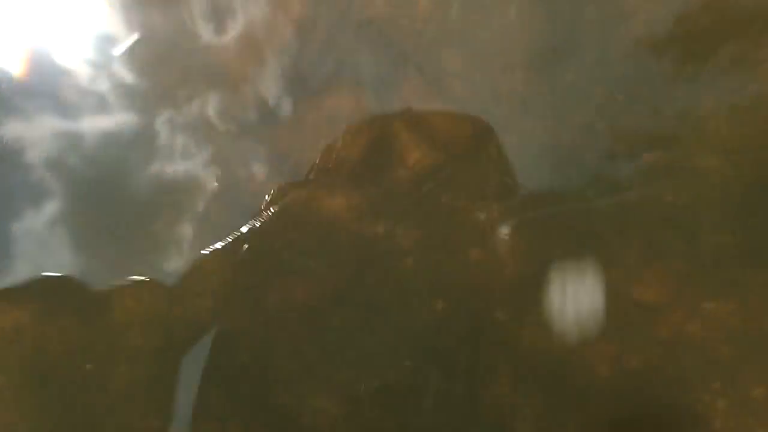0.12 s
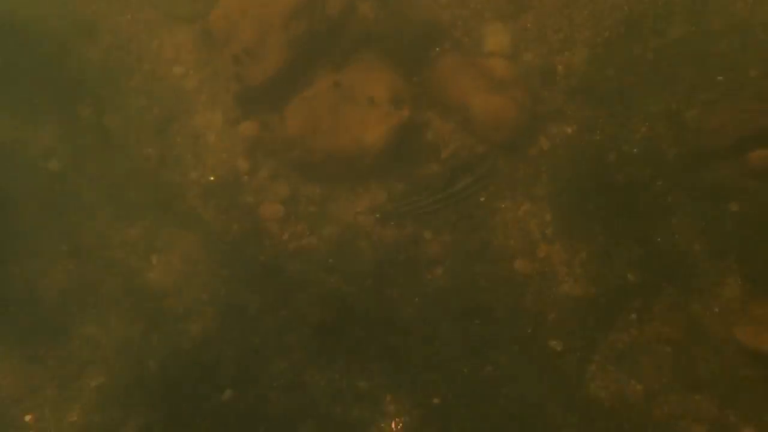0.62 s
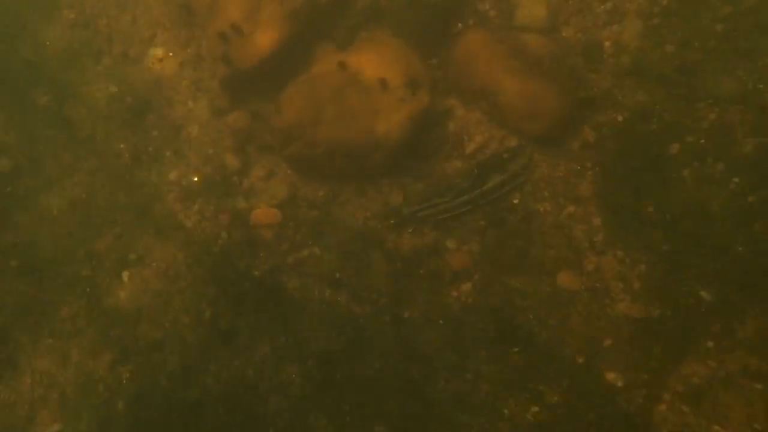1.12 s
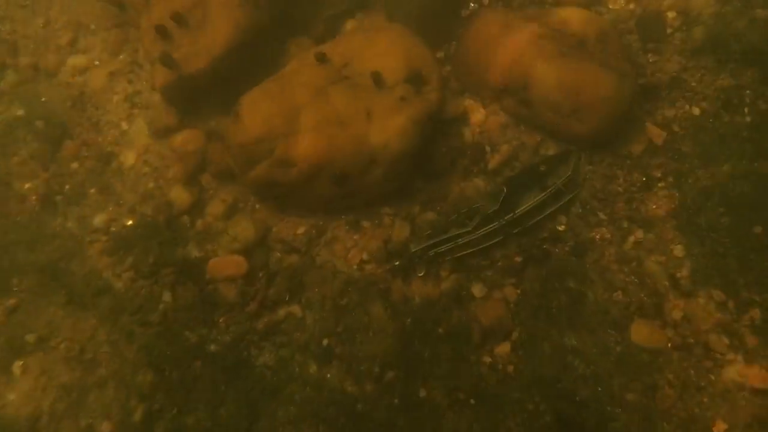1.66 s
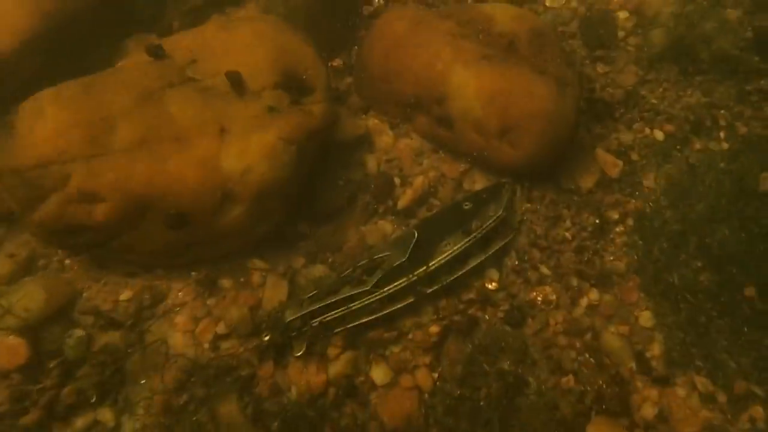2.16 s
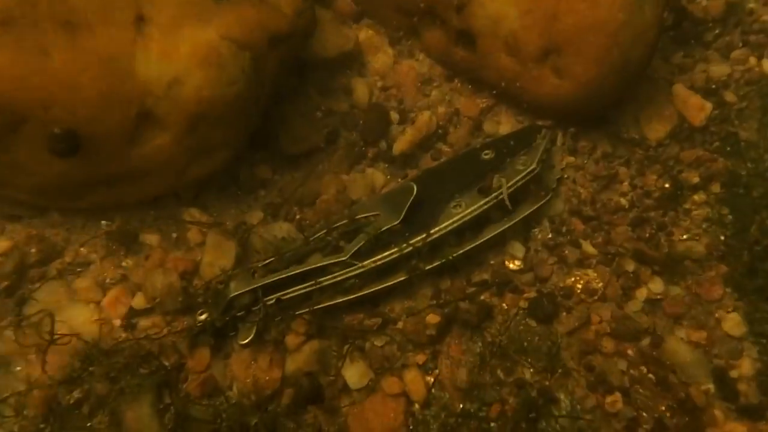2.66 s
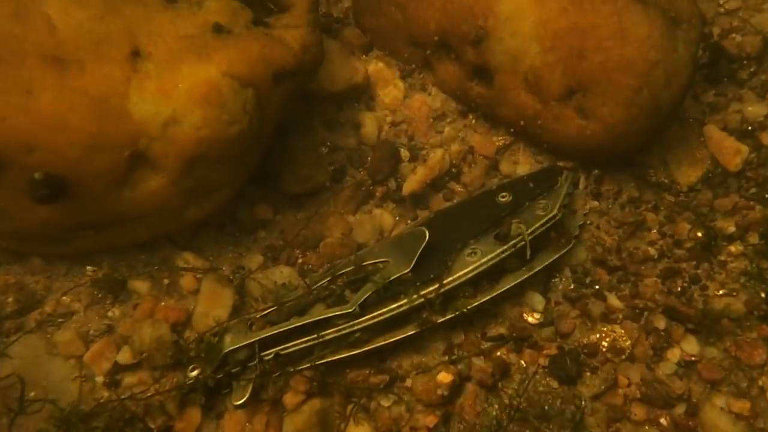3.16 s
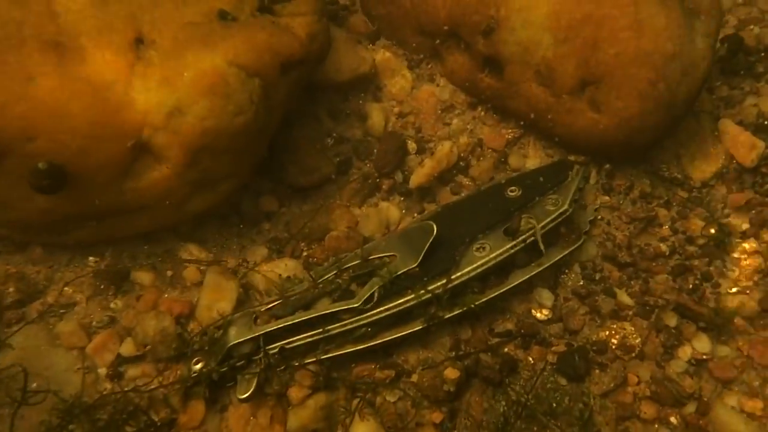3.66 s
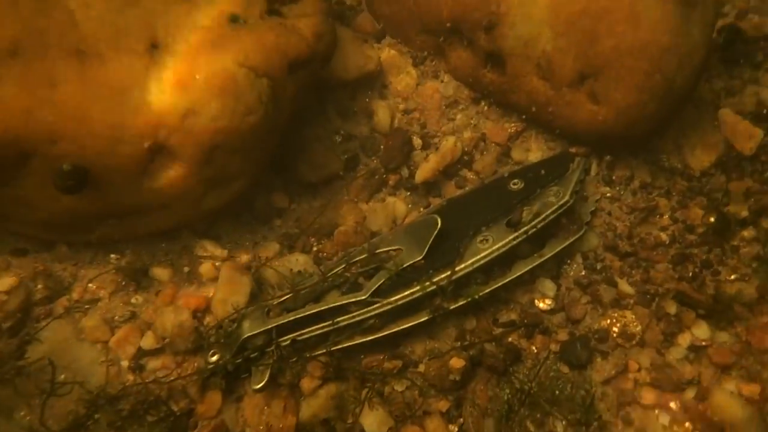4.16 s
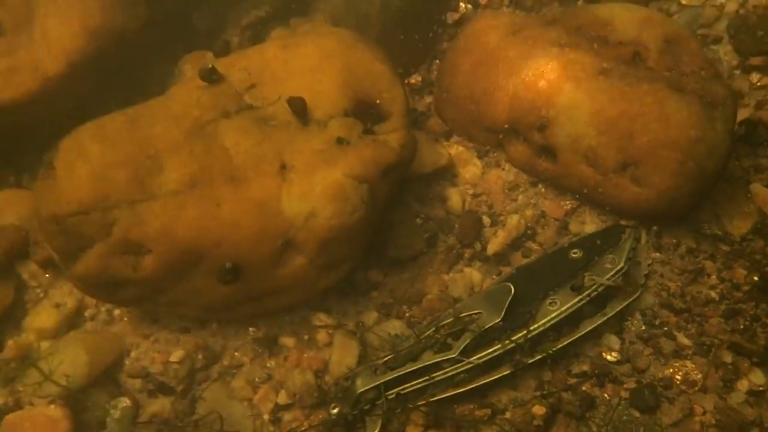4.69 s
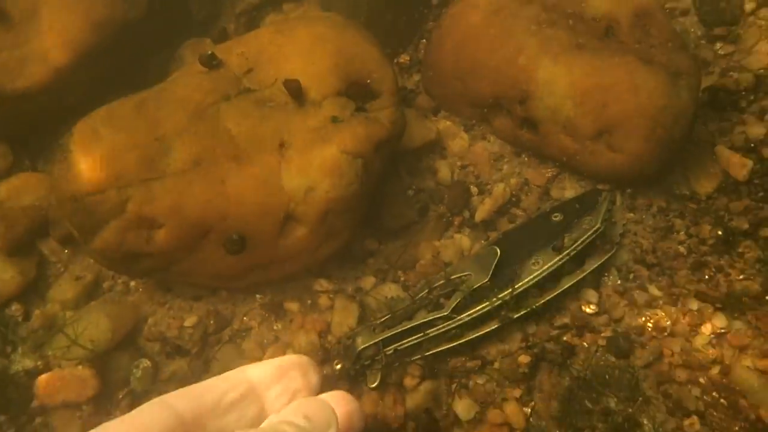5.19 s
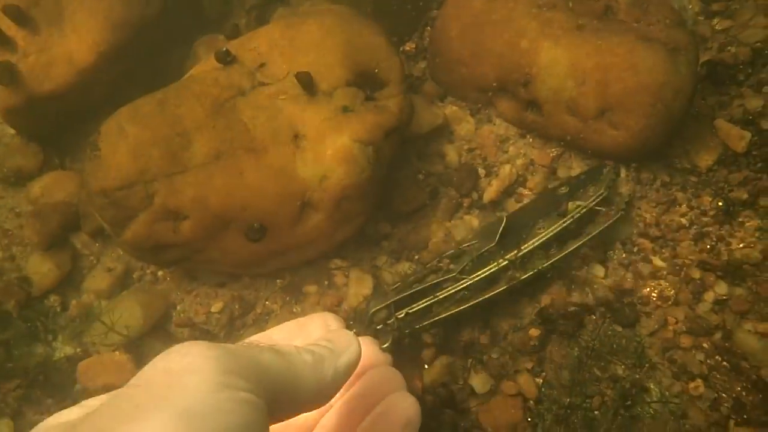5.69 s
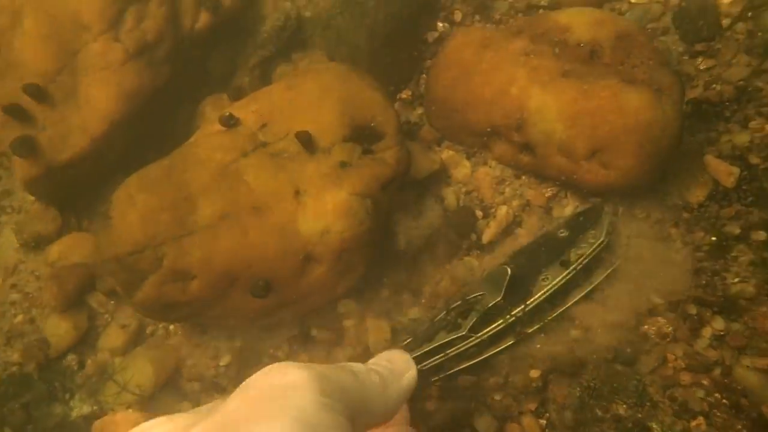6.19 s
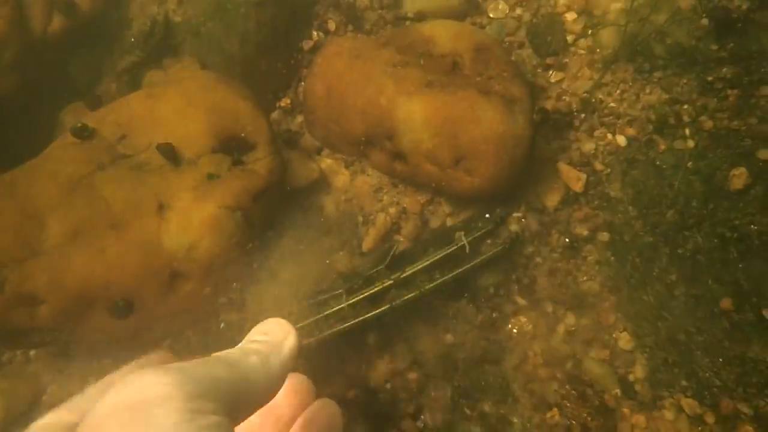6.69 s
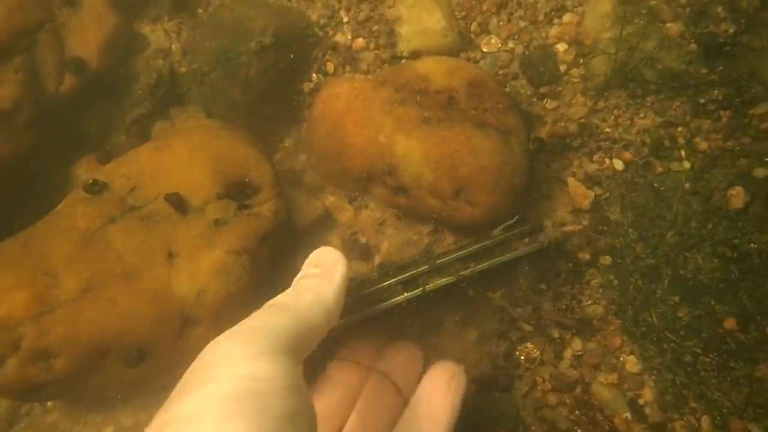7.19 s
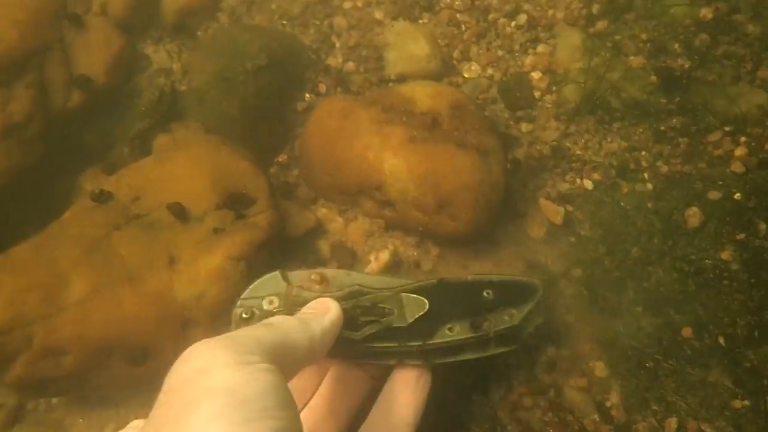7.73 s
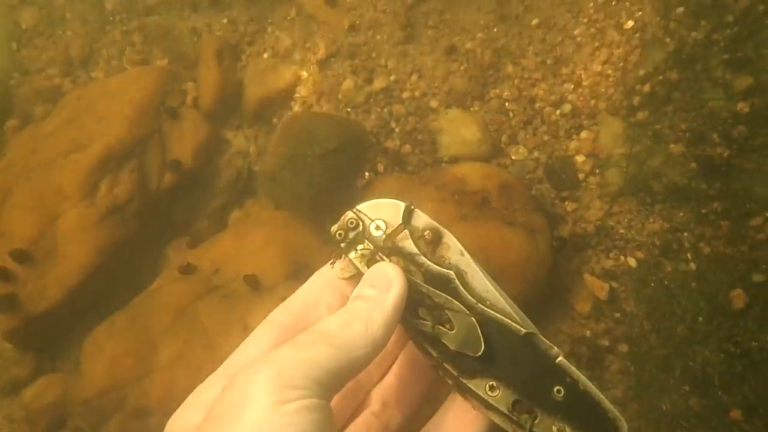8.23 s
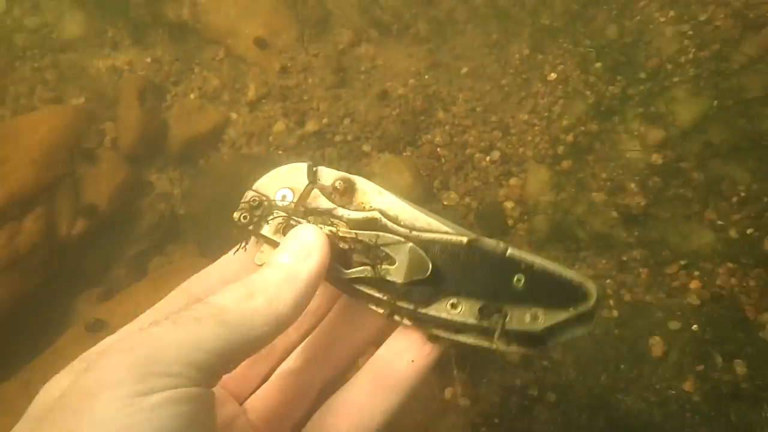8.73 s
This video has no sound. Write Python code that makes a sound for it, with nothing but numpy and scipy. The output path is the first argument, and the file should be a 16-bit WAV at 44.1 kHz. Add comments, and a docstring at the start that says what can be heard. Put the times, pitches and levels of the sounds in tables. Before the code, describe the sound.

Foam fizzes on the left, a splashy plunge, then muffled underwater current thumping and gurgling, with bubbles, hollow knocks and a soft mechanical buzz.

```python
"""Foam crackles, mostly on the left, until the port of a small camera pushed into a river floods; then all is muffled.
Current thumps on the housing and trapped air gurgles, both as clouds of short, damped wavelets; knocks, thumps and
gurgling lumps are short rings, some with a crack; bubbles and other single notes are damped tones that may slide.
Trains of soft pulses are first trapped air resonating in the port, later creaks of the grip,
and the camera's own works buzz once a picture over a faint hiss of filtered noise."""
import sys
import numpy as np
from scipy import signal
from scipy.fft import rfft, irfft
from scipy.io import wavfile
from scipy.ndimage import uniform_filter1d

SR = 44100
rng = np.random.default_rng(int(sys.argv[2]) if len(sys.argv) > 2 else 0)


def voltage_ratio(decibels):
    """Convert decibels (scalar or array-like) to amplitude ratios, 20 dB per decade."""
    exponent = np.asarray(decibels, float) / 20
    return 10 ** exponent


def waveform_to_disk(signal):
    """Save audio, clipped to [-1, 1], as 16-bit WAV at the path in sys.argv[1]."""
    frames = np.transpose(np.atleast_2d(signal))
    scaled = np.clip(frames, -1, 1) * 32767
    samples = np.round(scaled).astype(np.int16)
    wavfile.write(sys.argv[1], SR, samples)


N = 390456  # length in samples

# hiss, which the buzz of the works is set against: (time [s], level [dB])
HISS_LEVEL = [(0.37, -81), (0.55, -73), (1.05, -81.5), (1.34, -70), (2.26, -70), (3.3, -62), (3.8, -63),
              (4.2, -69.5), (4.64, -61.5), (5.7, -61.5), (6.5, -60), (7.1, -65.5), (8.85, -60.5)]
# fizz of the foam, ending when the port floods: (time [s], level [dB])
FIZZ = [(0, -48.5), (.19, -38.5), (.27, -37.5), (.3, -28.5), (.362, -33.5)]
# tone colour of foam and fine crackle at the port: (frequency [Hz], relative level [dB])
FIZZ_COLOUR = [(590, -33), (1000, 2.5), (1500, -1), (2320, -14), (3530, -5), (4010, -13), (5630, 1.5),
               (7990, -1), (9980, -22), (12900, -21), (16300, -31)]
# ringing modes of the housing: (frequency [Hz], level [dB], time to fall 60 dB [s], taken as 0.002 if less)
HOUSING_MODES = [(1770, 12.5, 0.0028), (2600, -3.5, 0.0046), (3290, 0, 0.0036), (4600, -3, 0.0031),
                 (5240, -4, 0.0031), (6790, -15, 0.011), (11900, -15, 0.0014)]


def evened(x):
    """Scales a sound to an rms of one."""
    return x / np.sqrt(np.mean(x ** 2) + 1e-20)


def curves(rows):
    """Draws straight lines through the rows of a table: one curve over time for each column."""
    s, *columns = np.transpose(rows)
    return [np.interp(np.arange(N) / SR, s, c) for c in columns]


def read(points, hz, count=1):
    """Reads a column of a table at any frequency, on a logarithmic frequency axis."""
    points = np.transpose(points)
    return np.interp(np.log(hz + 1), np.log(points[0] + 1), points[count])


def coloured(x, points):
    """Filters a sound by a table of levels over frequency, then evens it."""
    gain = voltage_ratio(read(points, np.fft.rfftfreq(N, 1 / SR)))
    return evened(irfft(rfft(x) * gain, N))


def sides(x, pan_db):
    """Spreads a sound over left and right; pan_db is left over right, and the two gains add up to two."""
    gains = voltage_ratio(np.array([pan_db / 2, -pan_db / 2]).reshape(2, -1))
    return x * gains / np.cosh(pan_db * np.log(10) / 40)


def lagged(x):
    """Sound in the housing reaches the right port five samples later."""
    return np.array([x[0], np.roll(x[1], 5)])


def decay(t60, size):
    """A fading curve that falls 60 dB in t60 seconds."""
    return voltage_ratio(-60 * np.arange(size) / SR / t60)


def rings(modes, size=3000):
    """Sum of damped tones, one for each mode of a struck body."""
    t = np.arange(size) / SR
    return sum(voltage_ratio(db) * decay(max(t60, .002), size) * np.sin(2 * np.pi * hz * t) for hz, db, t60 in modes)


def soften(x, size):
    """Rounds off sharp edges with a smooth window of the given number of samples."""
    return signal.oaconvolve(x, np.hanning(int(size)))[:len(x)]


def add(mix, s, sound):
    """Adds a two-sided sound to the mix from time s on."""
    part = mix[:, round(s * SR):][:, :sound.shape[1]]
    part += sound[:, :part.shape[1]]


def ports(a, b):
    """Two ports behind water share part of the sound, with a shift of phase."""
    # (frequency [Hz], likeness of the sides [share], phase by which the left leads [rad])
    port_likeness = [(60, 0.53, -0.05), (141, 1, -0.04), (290, 0.82, -1.28), (598, 1, 2.18),
                     (1320, 0.32, -3.5), (3200, 0.14, 2.5)]
    hz = np.fft.rfftfreq(N, 1 / SR)
    same = np.clip(read(port_likeness, hz), 0, 1)
    shared = same * rfft(a) * np.exp(-1j * read(port_likeness, hz, count=2))
    own = np.sqrt(1 - same ** 2) * rfft(b)
    return np.array([a, irfft(shared + own, N)])


def grains(low_hz, high_hz, turns, per_s, spread_db, clumps):
    """Short damped wavelets of many sizes, set off at random, more often in the clumps."""
    out = np.zeros((2, N))
    for hz in np.geomspace(low_hz, high_hz, num=10):
        u = np.arange(int(5 * turns * SR / hz)) * hz / SR / turns
        wavelet = u * np.exp(-2 * u) * np.sin(2 * np.pi * turns * u)
        when = rng.random((2, N)) < per_s * clumps / 10 / SR
        size = voltage_ratio(spread_db * np.minimum(rng.exponential(1, (2, N)), 4)) * rng.choice([-1, 1], (2, N))
        out += signal.oaconvolve(when * size, wavelet[None])[:, :N]
    return ports(*evened(out))


def hiss():
    """The noise of the microphones: coloured random noise, 5 dB stronger on the left."""
    # (frequency [Hz], relative level [dB])
    hiss_colour = [(1350, -38.5), (2300, -18.5), (2780, -10.5), (3060, -1.5), (4150, -18.5), (4690, -5.5),
                   (5620, -2), (6100, -6.5), (8050, 1.5), (9640, -7.5), (15100, -8), (16300, -6)]
    (level_db,) = curves(HISS_LEVEL)
    noise = coloured(rng.standard_normal((2, N)), hiss_colour)
    return voltage_ratio(level_db) * noise * voltage_ratio(np.array([[9], [4]]))


def works():
    """Once a picture a soft kick, a weaker one after it and a dying shudder ring the works."""
    # buzz: (time [s], level above the hiss curve [dB], left over right [dB])
    buzz_levels = [(0, -21, 11.5), (2.6, 20, 1), (2.9, 18.5, -36), (3.9, 20.5, -8), (4.3, 33.5, 8),
                   (5.3, 32, 7), (6.3, 33, 7.5), (8.85, 31.5, 8)]
    # body of the works: (frequency [Hz], level [dB], time to fall 60 dB [s])
    body_modes = [(766, 9.5, 0.034), (893, 10.5, 0.02), (1010, -10, 0.4), (488, -5, 0.049)]
    # thin upper modes: (frequency [Hz], level [dB], time to fall 60 dB [s])
    whine_modes = [(3030, 10, 0.02), (3460, -7.5, 0.073)]
    pictures_per_s, start_s, strong_db = 30000 / 1001, .0152, 5.5
    (hiss_db,), (buzz_db, pan_db) = curves(HISS_LEVEL), curves(buzz_levels)
    picture = np.arange(int(N / SR * pictures_per_s))[:, None]
    chance = rng.standard_normal((len(picture), 2, 2))
    after_s, kick_db = np.array([0, .021]), np.array([0, -9])
    at = (start_s + picture / pictures_per_s + after_s + .0004 * chance[..., 0]) * SR
    size_db = kick_db + 0.95 * chance[..., 1] + strong_db * (picture % 2)  # every other picture is stronger
    kicks = np.zeros(N)
    np.add.at(kicks, np.clip(at.astype(int), 0, N - 1), voltage_ratio(size_db))
    shudder = signal.oaconvolve(kicks, decay(0.035, 3000))[:N]
    drive = kicks + (0.02 + 0.094 * shudder) * rng.standard_normal(N)  # a steady rattle runs between the kicks
    body = evened(signal.oaconvolve(soften(drive, 37), rings(body_modes))[:N])
    whine = evened(signal.oaconvolve(soften(drive, 6), rings(whine_modes))[:N])
    buzz = lagged(sides((body + voltage_ratio(-34.5) * whine) * voltage_ratio(buzz_db), pan_db))
    return voltage_ratio(hiss_db) * buzz


def ticks():
    """Last air leaves the ports in loose clusters of faint clicks, each ringing two upper modes of the housing."""
    # (time [s], ticks on each side [per s], level of the smallest, before ringing [dB])
    tick_rates = [(.36, 5, -41), (.37, 41, -43), (.6, 71, -40), (.9, 25, -49.5), (2.4, 13, -45.5),
                  (2.9, 2.6, -63.5)]
    per_s, level_db = curves(tick_rates)
    wander = evened(uniform_filter1d(uniform_filter1d(rng.standard_normal(N), 1500), 1500))
    clusters = voltage_ratio(7.9 * wander)
    size = voltage_ratio(level_db + 5.3 * np.minimum(rng.exponential(1, (2, N)), 3))
    size *= rng.random((2, N)) < per_s * clusters / clusters.mean() / SR
    clicks = size + 0.62 * size[::-1]  # each is heard more softly on the other side
    places = len(HOUSING_MODES) - 2
    place = rng.integers(0, places, N)
    out = np.zeros((2, N))
    for k in range(places):
        ring = soften(rings(HOUSING_MODES[k + 1:k + 3]), 3)
        out += signal.oaconvolve(clicks * (place == k), ring[None])[:, :N]
    return out


def grit():
    """Fine grit rustles past the left port: dense tiny ticks swell and fade over a duller swish."""
    # (start [s], end [s], crackle level [dB], swish level [dB]), before the swell and the sides
    rustles = [(1.085, 1.119, -57.5, -38.5), (2.02, 2.056, -40.5, -44), (3.946, 3.991, -33, -25.5),
               (4.624, 4.639, -40.5, -55), (5.588, 5.776, -59, -38.5), (5.994, 6.065, -53, -33.5),
               (6.255, 6.338, -46.5, -40), (6.313, 6.449, -42, -50), (6.915, 7.153, -53, -40),
               (8.697, 8.708, -42.5, -23)]
    # (frequency [Hz], relative level [dB])
    swish_colour = [(500, -15), (1000, 7.5), (1800, -7), (3300, -26), (4200, -42)]
    sparks = 3.5 * rng.exponential(1, N) * (rng.random(N) < 900 / SR)
    crackle = coloured(rng.standard_normal(N) * (0.44 + sparks), FIZZ_COLOUR)
    swish = coloured(crackle, swish_colour)
    out = np.zeros((2, N))
    for start, end, db, swish_db in rustles:
        span = slice(int(start * SR), int(end * SR))
        part = voltage_ratio(db) * crackle[span] + voltage_ratio(swish_db) * swish[span]
        swell = np.sin(np.pi * np.linspace(0, 1, len(part)) ** 0.86) ** 2
        add(out, start, sides(part * swell, np.array(9.)))
    return out


def pulse_trains():
    """Trains of soft pulses: early ones the trapped air's resonance in the port, later ones creaks of the grip."""
    # (start [s], end [s], pulses [per s], level [dB], modes over swing [dB], lift of the upper modes [dB])
    trains = [(0.558, 0.619, 530, -21.5, 5, 9), (0.641, 0.92, 610, -31.5, -19, -9),
              (0.746, 0.776, 236, -16.5, -12, 1), (0.798, 0.846, 217, -13, -28, 0),
              (0.9, 0.946, 180, -23, -11, -7), (1.06, 1.118, 158, -18.5, -9.5, 11.5),
              (1.528, 1.572, 720, -23.5, -1, 3.5), (1.691, 1.695, 170, -23.5, -4.5, 17),
              (1.716, 1.789, 156, -16, -4.5, 6), (1.811, 1.818, 180, -21.5, 2, 1),
              (1.841, 1.845, 187, -17.5, 0.5, 7), (1.857, 1.867, 130, -18, -6, 5.5),
              (1.877, 1.889, 147, -16.5, -14, -1), (1.896, 1.911, 130, -18, -2, 5.5),
              (1.927, 1.942, 136, -21.5, 3, 3.5), (1.951, 1.992, 172, -16, -2.5, 6),
              (2.006, 2.04, 188, -17.5, 0, -8), (2.063, 2.065, 113, -11.5, -2, 5),
              (2.08, 2.089, 107, -16, -8, 8), (2.097, 2.106, 170, -17.5, -1.5, 7),
              (2.772, 2.836, 193, -16.5, -27.5, 8), (7.731, 7.764, 67, -26.5, 17, 3)]
    # (frequency [Hz], level [dB], time to fall 60 dB [s]); the last two are the upper modes
    train_modes = [(507, 9, 0.027), (780, 7, 0.015), (954, -15.5, 0.012), (1620, -4, 0.016),
                   (1947, -10, 0.019)]
    out = np.zeros((2, N))
    swell = np.sin(np.pi / 2 * np.minimum(np.arange(3000) / SR / 0.00043, 1)) ** 2  # the modes set in softly
    chance = rng.standard_normal((len(trains), 2, 14000))
    for (start, end, per_s, db, over_db, upper_db), (a, b) in zip(trains, chance):
        size = int((end - start) * SR)
        uneven = per_s / 3000  # faster pulses come less evenly
        rate = per_s * (1 + uneven * evened(uniform_filter1d(a, size=300)))
        turns = np.cumsum(rate)[:size] / SR
        pulses = np.diff(np.floor(turns), prepend=-1) * voltage_ratio(30 * uneven * b[:size])
        body = evened(rings(train_modes[:3]) + voltage_ratio(upper_db) * rings(train_modes[3:]))
        swing = evened(rings([(per_s, 0, 3.1 / per_s)]))  # a damped tone at the rate of the pulses
        ring = swing + voltage_ratio(over_db) * body * swell
        sound = soften(soften(signal.fftconvolve(pulses, ring), size=21), size=21)
        sound *= voltage_ratio(db) / sound[:size + 150].std()
        add(out, start, np.array([sound, 0.63 * np.roll(sound, -20)]))  # softer and earlier on the right
    return out


def rasp():
    """A finger drags over the port: hard slips that quicken, each ringing the air in the half-covered port."""
    # (start [s], end [s], slips at first [per s], slips at last [per s], level [dB])
    drag = (7.548, 7.616, 106, 146, -13)
    # (frequency [Hz], level [dB], time to fall 60 dB [s])
    covered_modes = [(369, 3.5, 0.045), (760, -0.5, 0.014), (945, -4, 0.033), (1380, -27, 0.024)]
    start, end, first_per_s, last_per_s, db = drag
    size, out = int((end - start) * SR), np.zeros((2, N))
    turns = np.cumsum(np.linspace(first_per_s, last_per_s, size)) / SR
    slips = np.diff(np.floor(turns), prepend=-1) * voltage_ratio(2.5 * rng.standard_normal(size))
    slips += 0.07 * rng.standard_normal(size)  # the skin scrapes between the slips
    sound = soften(soften(signal.fftconvolve(slips, rings(covered_modes)), size=21), size=21)
    add(out, start, np.array([sound, sound]) * voltage_ratio(db) / sound[:size].std())
    return lagged(out)


def single_tones():
    """Single damped tones, from bubbles, thumps and knocks, whose pitch may slide, a few steeply."""
    # (time [s], level at the start [dB], frequency at the start [Hz], time to fall 60 dB [s],
    #  half the pitch change over that fall [share])
    tones = [(0.09, -17, 60, 0.074, -0.11), (0.154, -16, 742, 0.066, -0.25), (0.204, -3, 68, 0.037, -0.089),
             (0.231, -24.5, 1640, 0.023, 0.079), (.268, -14.5, 1470, 0.016, 0.039),
             (0.291, -11, 1780, 0.0072, -0.0085), (0.352, -7, 880, 0.015, 0.58),
             (0.566, -30, 1830, 0.04, 0.15), (0.492, 7.5, 112, 0.041, -0.1),
             (0.587, -16.5, 996, 0.04, 0.088), (0.597, -17, 1400, 0.037, 0.11),
             (.742, -14.5, 535, 0.19, -0.078), (.745, -17.5, 778, 0.15, -0.085),
             (.62, -27.5, 809, 0.45, 0.07), (.672, -19.5, 533, 0.2, 0.041), (0.68, -14, 920, 0.045, 0.09),
             (1.195, -30, 1390, 0.054, -0.38), (1.309, -31, 1550, 0.031, 0.62),
             (1.36, -8.5, 890, 0.018, 0.14), (1.363, -15, 1720, 0.033, 0.26),
             (1.557, -17.5, 513, 0.16, -0.22), (1.629, 6, 290, 0.028, -0.089),
             (2.187, -11, 1410, 0.018, 0.065), (2.386, -35, 1070, 0.065, -0.033),
             (2.397, -18, 465, 0.058, 0.014), (2.566, -30.5, 1250, 0.068, -0.22),
             (2.71, -26, 1010, 0.1, 0.16), (2.71, -30, 1470, 0.045, -0.17),
             (2.793, -22, 1047, 0.053, -0.11), (4.104, -26.5, 1080, 0.04, 0.23),
             (4.123, -29.5, 1290, 0.062, 0.039), (4.147, 1, 121, 0.028, 0.21),
             (4.362, -35.5, 1540, 0.065, 0.026), (4.548, -26.5, 1300, 0.022, -0.028),
             (4.773, -35, 2140, 0.04, -0.18), (4.656, -23.5, 1310, 0.08, 0.2),
             (4.692, -21.5, 1120, 0.15, -0.22), (5.025, -18, 887, 0.097, -0.031),
             (5.154, -5.5, 760, 0.023, -.45), (5.194, -5.5, 725, 0.03, -0.47), (.857, -13.5, 520, 0.068, 0),
             (.9, -22, 503, 0.12, 0.067), (3.06, -32.5, 1150, .03, .1), (3.068, -43, 1440, 0.072, 0),
             (2.031, -28.5, 1910, 0.05, 0.11), (4.847, -34, 2600, 0.022, -.07),
             (5.715, -35, 1630, 0.049, 0)]
    out, t = np.zeros((2, N)), np.arange(5000) / SR
    for s, db, hz, t60, slide in tones:
        tone = np.sin(2 * np.pi * hz * (t + slide * t ** 2 / t60))
        fade = voltage_ratio(db) * decay(t60, len(t)) * np.minimum(t * hz, 1)  # sets in over one turn
        add(out, s, np.array([tone, tone]) * fade)
    return out


def knocks_and_thumps():
    """Knocks with a ragged crack and a short ring; the low ones are thumps and gurgling lumps."""
    # (time [s], strength of the ring [dB], its frequency [Hz], crack level [dB], left over right [dB])
    blows = [(0.3753, -5.5, 1150, -32, -8), (0.406, -10, 400, -32, -7), (0.4155, -6, 970, -44, -24),
             (0.422, -11, 844, -47, -19), (0.495, -5.5, 730, -42, 7), (0.445, -12, 670, -37, 8),
             (0.5023, -2.5, 660, -22, 5), (0.534, -5, 437, -48, 10), (0.5912, -6, 530, -51, 16),
             (0.6717, -9, 524, -49.5, 26), (0.955, -2.5, 300, -48, 6), (1.013, -8, 227, -51.5, -1),
             (1.117, -6.5, 234, -46, 1), (1.184, -7.5, 203, -65, -3), (1.435, -9, 290, -41, 3),
             (1.231, -1, 186, -45, -1), (1.326, -9, 263, -45, -3), (1.285, -7, 285, -50, 0),
             (1.368, -10, 1660, -32, -28), (1.4714, -2.5, 330, -37, -7.5), (1.584, -7, 478, -49, 3),
             (2.1876, 0, 428, -42, -28), (2.3124, -15.5, 446, -39.5, 3.5), (2.3433, -16, 430, -37.5, 5),
             (2.6327, 5, 434, -29, 3.5), (3.9581, -7.5, 830, -60, -33), (3.963, -10, 457, -25.5, 9),
             (4.15, -15.5, 400, -53, 18), (4.2014, 8.5, 890, -18.5, 26), (4.2284, -10.5, 1010, -46, 19),
             (4.274, 10.5, 960, -30, 43.5), (4.9863, -8.5, 760, -49, 2), (5.1547, -8, 654, -40.5, 14),
             (5.1951, 6, 500, -20.5, 6), (6.0361, -2.5, 1160, -38, 11), (6.052, 3.5, 390, -47, -1),
             (6.189, -8, 860, -59, 6), (6.361, 7.5, 870, -35, 8), (6.796, -1, 754, -15, 4),
             (6.9278, 5.5, 1310, -28.5, 8), (6.996, -8, 985, -36.5, 15), (7.116, -4, 770, -40, 9),
             (7.1409, -4.5, 790, -40, 8), (7.1676, -6, 730, -43, 10), (7.2066, 3.5, 780, -32.5, 14),
             (7.4596, -0.5, 754, -30.5, 15), (7.4791, 3.5, 780, -35.5, 15), (7.49, -3, 780, -43, 6),
             (7.747, -6, 362, -50, -1), (7.7688, 4, 464, -31, 8), (7.8499, -10, 1010, -40.5, 15),
             (8.0984, 4.5, 750, -22, 5.5), (8.4317, 1.5, 1230, -30.5, 9.5), (8.51, -7, 930, -49, 8),
             (8.686, -5.5, 920, -46, 9)]
    out, chance = np.zeros((2, N)), rng.standard_normal((len(blows), len(HOUSING_MODES) + 200))
    for (s, db, hz, crack_db, pan_db), c in zip(blows, chance):
        # every mode is struck a little differently each time
        crack = rings([(f, d + 2.0 * k, t60) for (f, d, t60), k in zip(HOUSING_MODES, c)])
        chatter = 0.49 * c[-200:] * decay(0.0089, 200)
        chatter[0] = 1
        ring = soften(rings([(hz, db, 11 / hz), (1.44 * hz, db - 27.0, 9 / hz)]), 10) / 6
        ragged = np.convolve(crack, chatter)[:len(ring)]
        add(out, s, sides(ring + voltage_ratio(crack_db) * ragged, pan_db))
    return lagged(out)


def foam():
    """Fizz of tiny bubbles until the port floods, and single loud, brighter bursts."""
    # (time [s], level before snap, spray and sides [dB])
    burst_list = [(0.202, -23), (0.218, -11.5), (0.2495, -10.5), (0.2786, -9), (0.295, -7.5), (0.3, -18),
                  (0.306, -5), (0.3124, 3), (0.316, -8), (0.321, -13), (0.34, -21), (0.347, -4),
                  (0.348, -15.5)]
    (fizz_db,), pan_db = curves(FIZZ), np.array(24)  # well to the left
    sparks = voltage_ratio(fizz_db - fizz_db[0]) * (rng.random(N) < 600 / SR) * rng.exponential(1, N)
    fizz = rng.standard_normal((2, N)) * (1 + sparks)
    dry_port = np.arange(N) < FIZZ[-1][0] * SR
    out = coloured(fizz, FIZZ_COLOUR) * sides(voltage_ratio(fizz_db) * dry_port, pan_db)
    noise = coloured(rng.standard_normal(N), FIZZ_COLOUR)
    bright = evened(signal.lfilter([1, -.65], 1, noise))
    puffs = bright[:len(burst_list) * 1200].reshape(-1, 2, 600)
    fade = decay(0.0041, 600) + 0.21 * decay(0.034, 600)  # a snap and its spray
    fade *= np.minimum(np.arange(600) / SR / 0.00019, 1)
    for (s, db), puff in zip(burst_list, puffs):
        add(out, s, sides(voltage_ratio(db) * fade * puff, pan_db))
    return out


def slams():
    """Swell in dB of eddies that slam into the housing: each swells and sinks again about equally fast."""
    # (time of the crest [s], height above the flow [dB])
    crests = [(.955, 12), (2.609, 3.5), (2.858, 10), (4.04, 6.5), (6.33, 12), (7.02, 8), (7.33, 12.5),
              (7.43, 11.5)]
    t, rise_s, fall_s = np.arange(N) / SR, 0.067, 0.055
    return sum(db * np.exp(-((t - s) / np.where(t < s, rise_s, fall_s)) ** 2) for s, db in crests)


def current():
    """Eddies thump the housing, trapped air wobbles, small bubbles wash and blip; all come in the same surges."""
    # under water: (time [s], buffeting [dB], gurgle of trapped air [dB], small bubbles [dB]), before slams and sides
    flow = [(0.0, -56, -31.5, -49.5), (0.27, -26, -29.5, -53), (0.345, -54, -18.5, -50),
            (0.39, -34, -20.5, -36), (0.6, -39, -29.5, -37), (0.9, -49.5, -22, -40), (1.0, -39, -33, -48),
            (1.26, -27.5, -22.5, -39.5), (1.6, -30, -24.5, -51.5), (1.68, -41, -19.5, -49),
            (2.16, -31.5, -23, -53.5), (2.5, -24, -23.5, -43.5), (3.0, -19, -23.5, -52),
            (4.0, -24.5, -25, -50), (4.25, -29.5, -32, -46), (5.3, -34, -28, -53), (5.9, -21, -28, -49),
            (6.2, -26.5, -27.5, -43), (6.6, -28, -25, -46.5), (7.25, -36, -35, -48.5),
            (8.85, -26, -28.5, -48.5)]
    # the side the current presses on: (time [s], left over right [dB])
    sway = [(0.0, 8), (0.67, 4), (0.76, -4), (1.38, -1.5), (2.34, -6), (2.76, -1.5), (3.84, -4.5),
            (4.26, 12), (4.41, -3.5), (8.85, -3.5)]
    (buffet_db, gurgle_db, small_db), (pan_db,), slam_db = curves(flow), curves(sway), slams()
    surge = evened(uniform_filter1d(uniform_filter1d(rng.standard_normal(N), 700), 700))
    clumps = voltage_ratio(6.5 * surge) / voltage_ratio(6.5 * surge).mean()
    buffeting = voltage_ratio(buffet_db + slam_db) * grains(38.4, 102.6, 1.5, 250, 0.47, clumps ** .4)
    gurgle = voltage_ratio(gurgle_db + 0.65 * slam_db) * grains(110.3, 563, 1.36, 500, 3.12, clumps)
    wash = grains(624, 1860, 1.65, 5000, 5.1, clumps)
    blips = voltage_ratio(-2.0) * grains(500, 1900, 4.9, 26, 3.9, clumps ** 0.41)
    # the low sounds reach full strength as the port floods
    flooded = np.clip((np.arange(N) / SR - FIZZ[-1][0]) / .02 + 1, .15, 1)
    return (buffeting + gurgle) * sides(flooded, pan_db) + voltage_ratio(small_db) * (wash + blips)


def scene():
    """All the sources together."""
    water = current() + foam() + ticks() + grit()
    single_sounds = pulse_trains() + knocks_and_thumps() + single_tones() + rasp()
    return water + single_sounds + works() + hiss()


def gain_control(x):
    """Deaf to the highest treble, the gain drops just ahead of a peak by what exceeds the limit, then climbs back."""
    limit_db, recovery_db_per_s, sense_s, grab_s = -12, 69, 0.002, 0.0007
    power = (uniform_filter1d(x, size=7) ** 2).mean(0)
    power_db = 10 * np.log10(abs(uniform_filter1d(power, int(sense_s * SR))) + 1e-12)
    climb, grab = np.arange(N) * recovery_db_per_s / SR, int(grab_s * SR)
    held_db = np.maximum.accumulate(power_db + climb) - climb
    over_db = np.maximum(held_db - limit_db, 0)
    return x * voltage_ratio(-uniform_filter1d(over_db, grab, origin=-(grab // 2)))  # shifted to act early


def band_limit(x):
    """A steep low-pass at the top of the band."""
    return signal.sosfilt(signal.butter(12, 16440, fs=SR, output="sos"), x)


def record(dry):
    """The deepest bass is cut, the gain ducks at loud moments, peaks stop at full scale, the top treble is cut."""
    x = signal.sosfilt(signal.butter(2, 32, "high", fs=SR, output="sos"), dry)
    x = np.clip(gain_control(x), -1, 1)
    treble_cut = signal.firwin(511, 15900, window=("kaiser", 9), fs=SR)
    x = signal.oaconvolve(x, treble_cut[None], "same")
    return band_limit(x)


dry = scene()
out = record(dry)
waveform_to_disk(out)
```